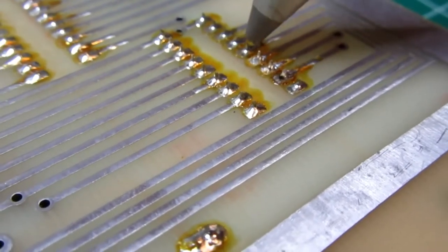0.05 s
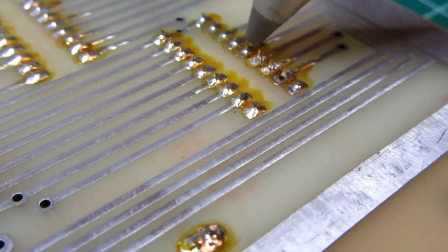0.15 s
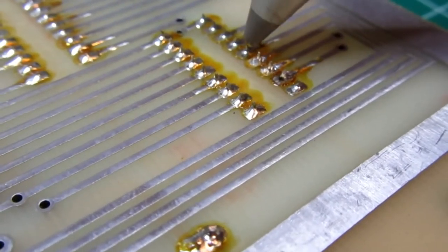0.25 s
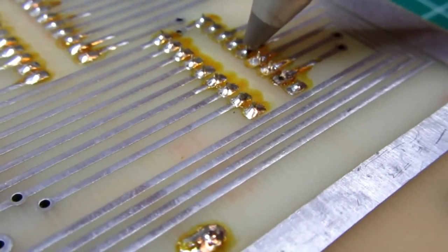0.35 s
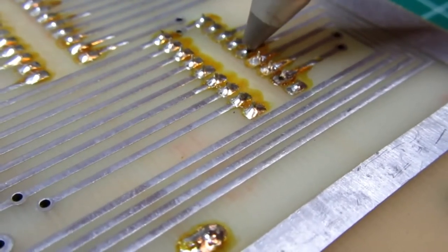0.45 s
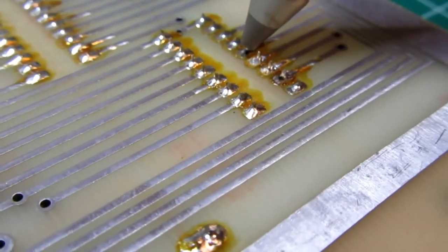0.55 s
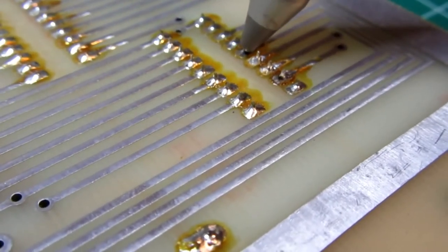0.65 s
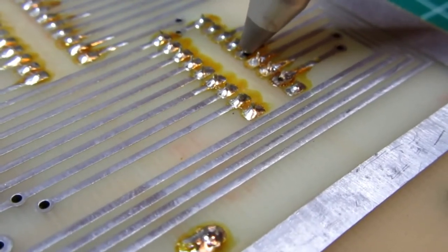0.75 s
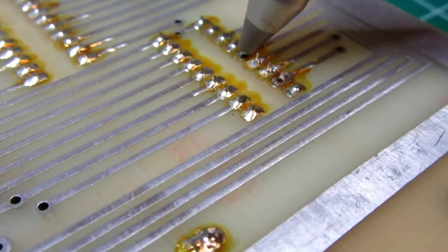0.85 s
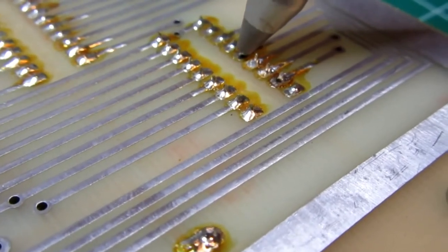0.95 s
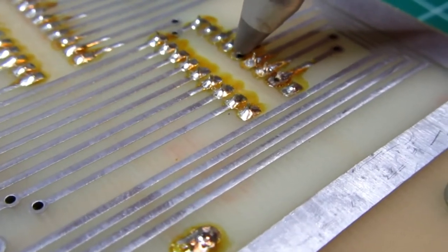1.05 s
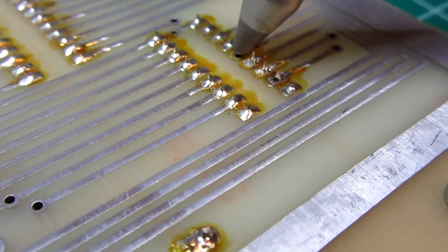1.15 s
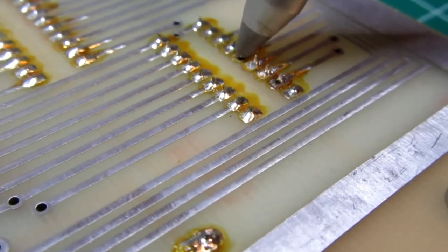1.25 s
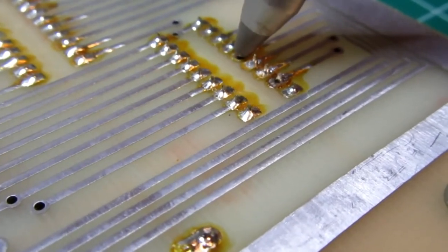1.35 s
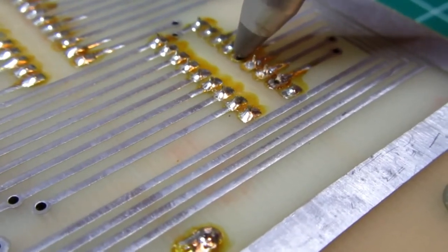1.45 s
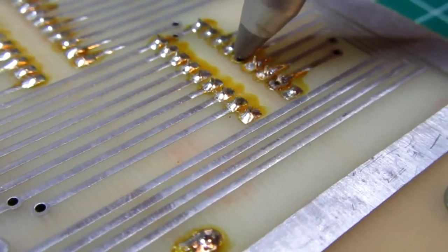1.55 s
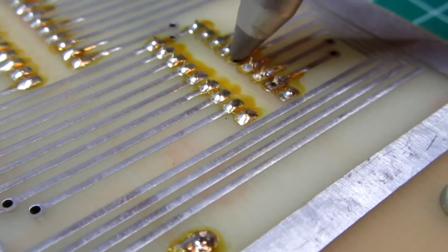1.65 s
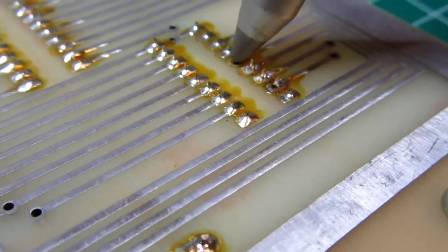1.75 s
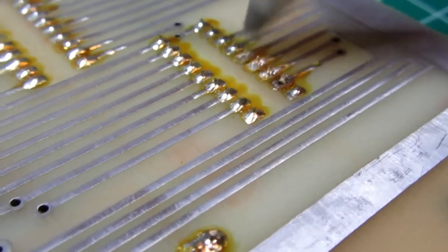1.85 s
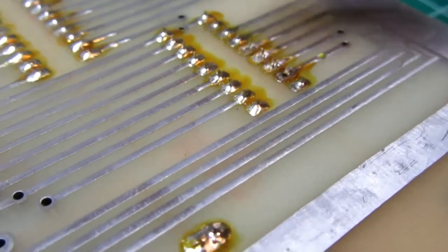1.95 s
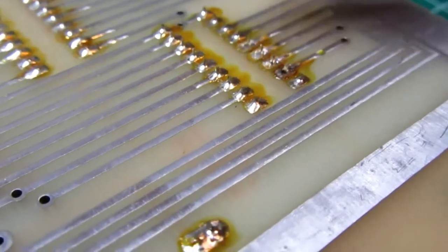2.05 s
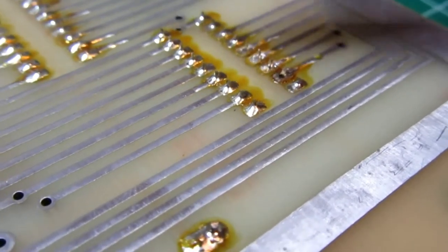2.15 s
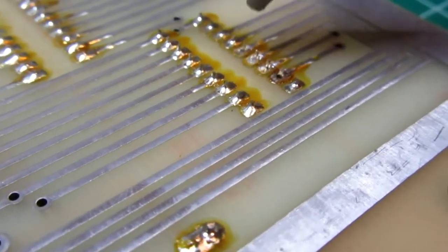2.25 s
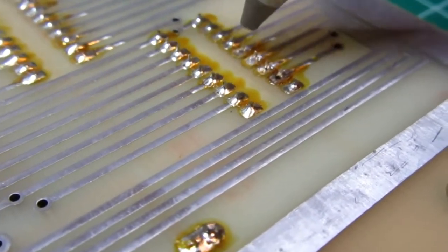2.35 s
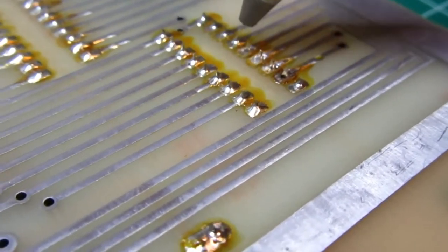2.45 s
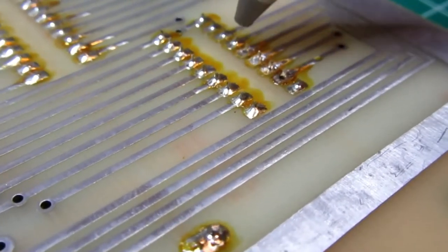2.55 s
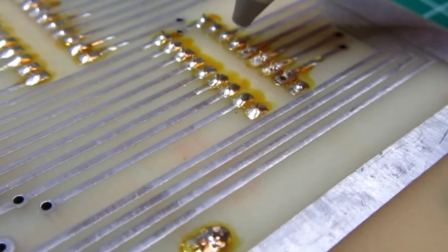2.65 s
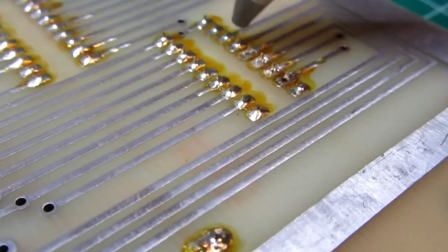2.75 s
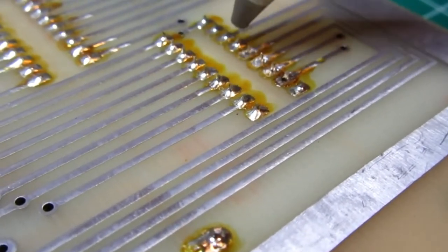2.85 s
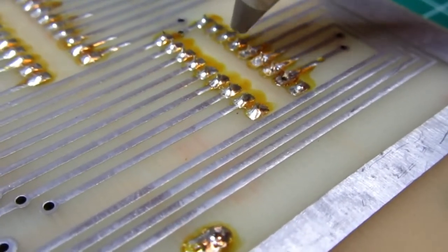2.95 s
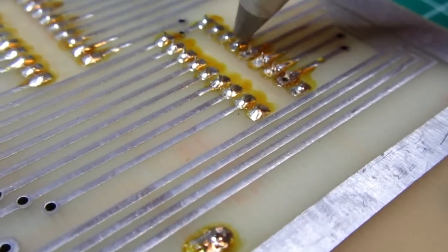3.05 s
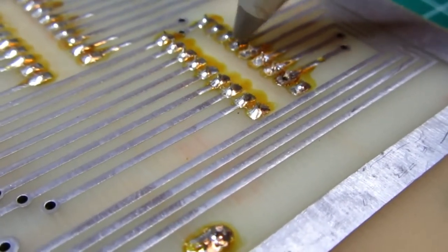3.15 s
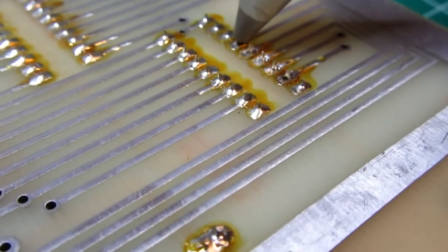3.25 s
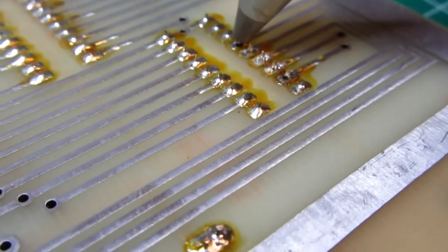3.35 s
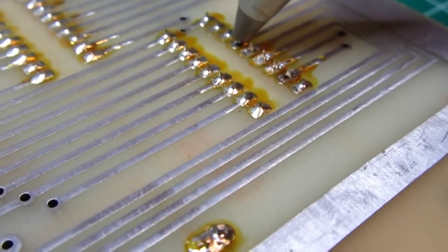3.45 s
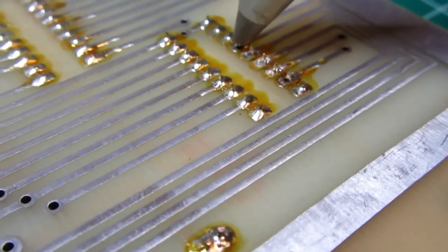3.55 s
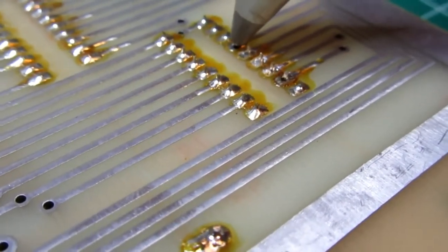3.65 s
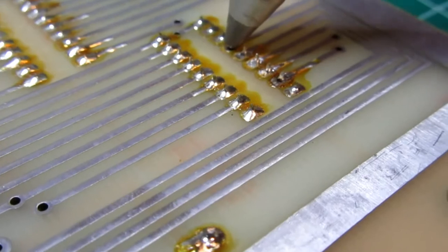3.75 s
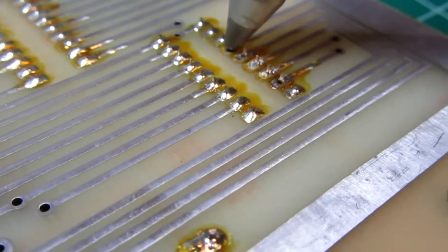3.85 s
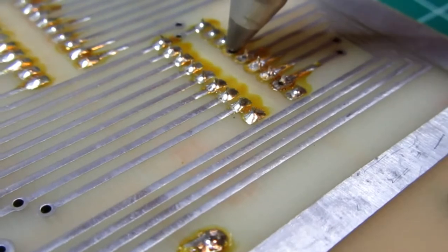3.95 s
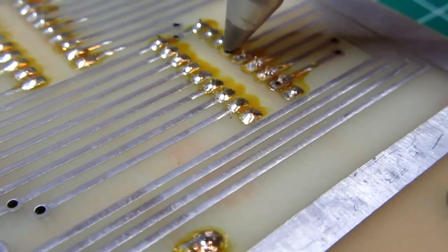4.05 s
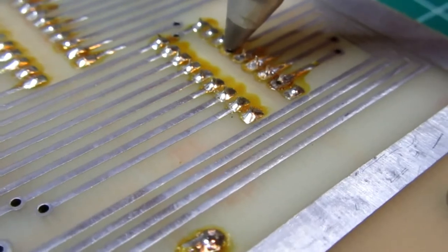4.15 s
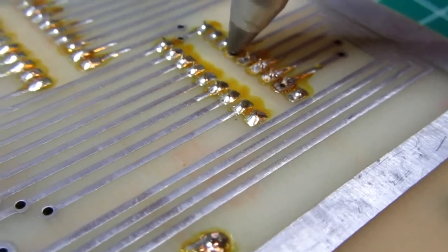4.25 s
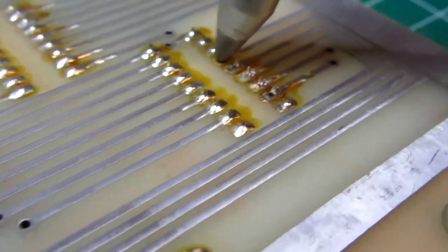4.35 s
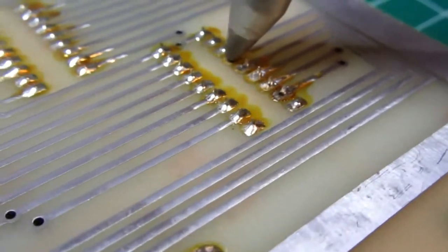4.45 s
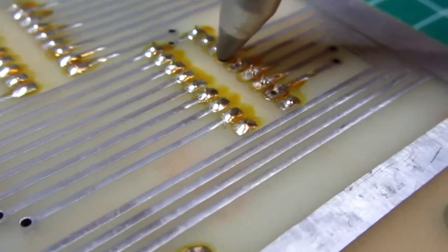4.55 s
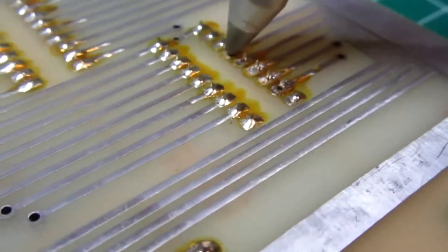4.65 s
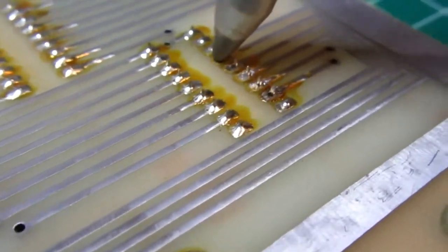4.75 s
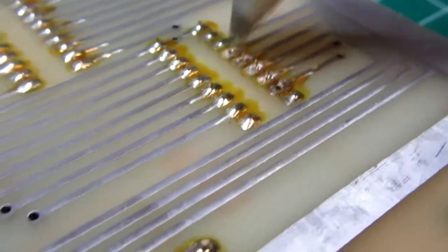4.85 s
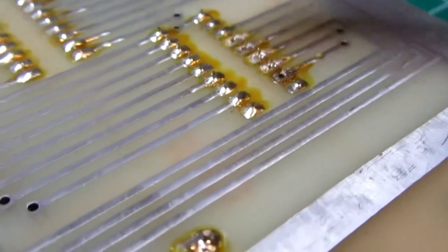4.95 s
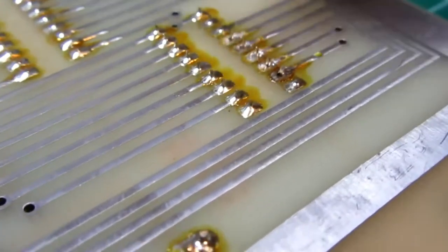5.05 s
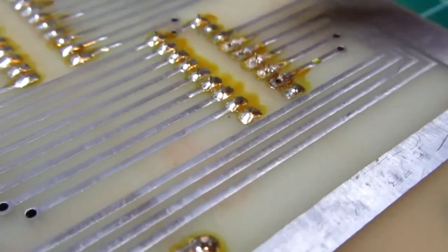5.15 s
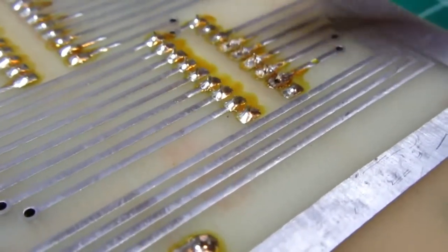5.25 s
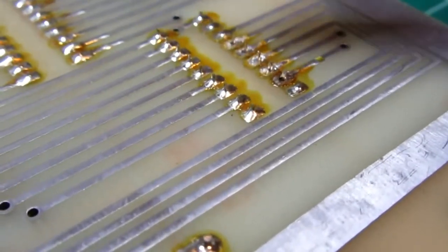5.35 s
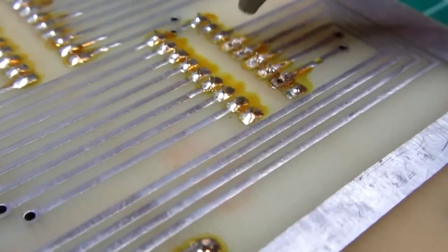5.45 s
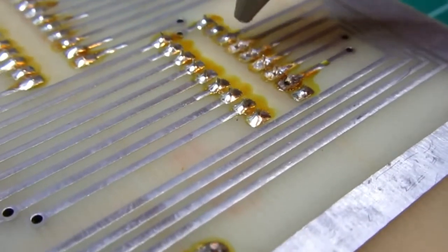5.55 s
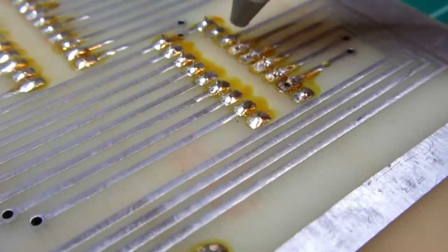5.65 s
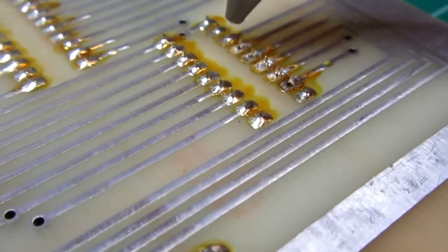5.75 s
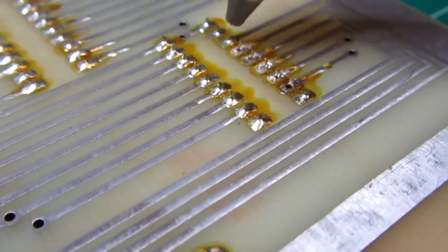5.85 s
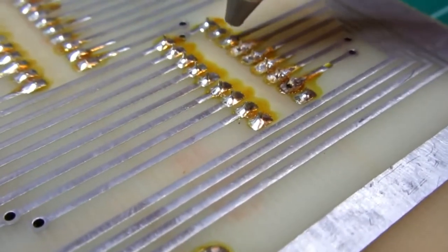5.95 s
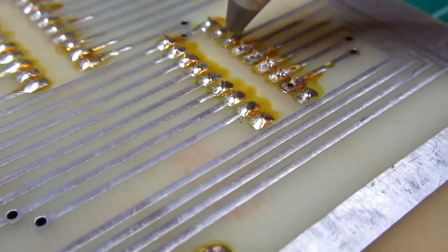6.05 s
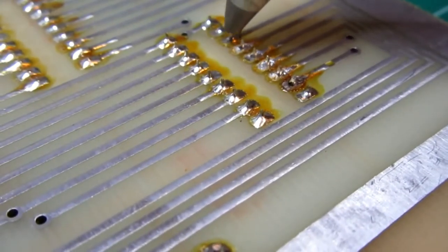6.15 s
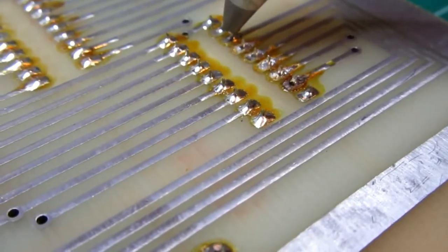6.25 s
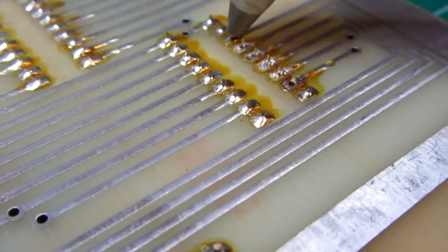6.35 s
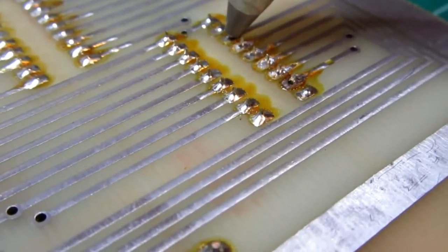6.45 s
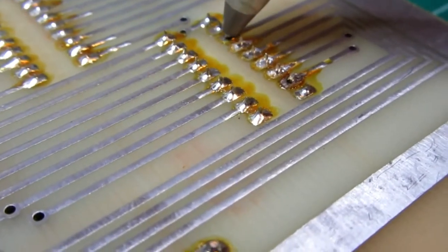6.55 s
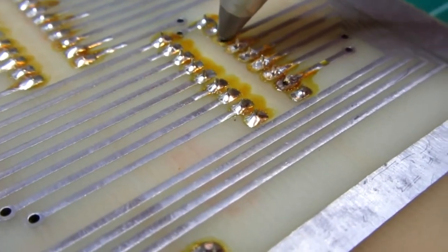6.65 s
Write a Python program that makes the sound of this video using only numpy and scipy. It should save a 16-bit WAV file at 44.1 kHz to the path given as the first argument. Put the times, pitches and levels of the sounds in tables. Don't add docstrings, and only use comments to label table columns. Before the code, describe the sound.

Close on a workbench in a small quiet room with faint fans, a desoldering tip taps a circuit board, then a trigger snaps. A small diaphragm pump jumps to a hard, rattling buzz while air hisses through a tube and solder beads tick sharply. It stops with a gasp and a faint metal ring. More taps precede a second, longer run; after another pause the third run is cut off at the end.

```python
import sys
import numpy as np
from scipy import signal
from scipy.fft import rfft, irfft, next_fast_len
from scipy.io import wavfile
from scipy.ndimage import uniform_filter1d, map_coordinates

SR = 44100
rng = np.random.default_rng(int(sys.argv[2]) if len(sys.argv) > 2 else 0)


def generate_wav(sig):
    pcm = np.round(np.clip(np.atleast_2d(sig).T, -1, 1) * 32767).astype(np.int16)
    wavfile.write(sys.argv[1], SR, pcm)


def rack_gain(trim_db):
    fader = np.asarray(trim_db, float)
    return 10 ** (fader / 20)


N = 295911

# power on in seconds, power off in seconds, motor level in dB, air level in dB.
RUNS = [
    (0.739, 1.76, 0, 1),
    (3.47, 4.8, 0, 0.5),
    (6.042, 7, 0, 0.5),
]
# time in seconds, speed in turns a second.
SHAFT_SPEED = [
    [(0.77, 57.6), (0.81, 65.2), (0.836, 69.6), (0.954, 75.0), (1.1, 77.2), (1.748, 78.1), (1.764, 77.0),
     (1.82, 61.7)],
    [(3.49, 57.5), (3.524, 63.7), (3.55, 68.1), (3.57, 70.8), (3.754, 77.6), (4.796, 79.3), (4.808, 77.0),
     (4.87, 59.4)],
    [(6.07, 56.2), (6.104, 62.9), (6.132, 68.2), (6.152, 71.2), (6.4, 77.5), (6.71, 79.0)],
]
BREAKAWAY = 47
SHUT_S, SHUT_DB_PER_S = .205, 2000
BENCH_TUNE = [.995, 1, 1.003]
# frequency in Hz, level in dB.
BENCH_2 = [(95, -65), (120, -40), (126, -30), (139, -31.5), (142.5, -49), (147, -38), (154, -37),
           (158, -37)]
BENCH_3 = [(150, -63), (180, -43), (190, -35), (212, -24), (223, -27), (231, -47), (233.5, -30), (238, -26)]
BENCH_4 = [(200, -36), (250, -40), (282, -31), (288, -34.5), (295, -47), (300, -45), (308, -52), (316, -30)]
# multiple of shaft speed, level in dB over the housing.
BUZZ_ORDERS = [(1, -35.5), (5, -19.5), (6, -17.5), (7, -23), (9, -21), (10, -12), (11, -7.5), (12, -9),
               (14, -17), (22, -16.5)]
# frequency in Hz, width in Hz, lift in dB.
SINGING_MODES = [(375.2, 17.6, 5), (665.4, 12, 15), (1068, 32, 2)]
# frequency in Hz, width in Hz, level in dB.
HOUSING = [(666.2, 14, -6.5), (750, 37, -11), (861.4, 14, 5), (922, 126, -10), (1030, 11, -5.5),
           (1350, 40, -16), (1810, 15, -12), (1975, 63, -14), (2298, 49, -13.5)]
# frequency in Hz, width in Hz, level in dB.
BASE_PLATE = [(313, 74, -7), (359.6, 41, 2.5), (513.4, 18, -4)]
# frequency in Hz, level in dB per Hz.
SHELL = [(24, -76.5), (40, -46.5), (102, -35), (144, -41), (189, -11), (235, -10), (426, -23.5),
         (590, -7.5), (863, 3.5), (1030, -5), (3000, -17), (3900, -18), (6600, -120)]

# frequency in Hz, level in dB per Hz.
TUBE = [(880, -35), (1500, 7), (1650, -9), (2280, -3), (3230, -8), (3880, -4.5), (7500, -17), (9750, -53.5),
        (16500, -120)]
# frequency in Hz, width in Hz, level in dB over the rush.
TUBE_PIPES = [(2810, 15, 1), (3800, 13, 12), (5000, 170, -13), (6030, 64, 12.5)]
# frequency in Hz, level in dB per Hz.
NOZZLE = [(2000, -60), (3500, -32), (6000, -3), (8400, -4), (11000, -7), (13500, -7), (15100, -9)]
# frequency in Hz, width in Hz, level in dB over the hiss.
NOZZLE_PIPES = [(8260, 70, 13), (9120, 100, 3), (11600, 90, 6), (11845, 16, 11)]
SUCK_S = 0.015
# frequency in Hz, level in dB per Hz.
GASP = [(2200, -25), (3200, 13), (6000, 2), (7500, -20), (9000, -2), (13500, 1), (15100, -10.5)]
GASP_AFTER_S, GASP_WIDE_S, GASP_DB = .135, .05, -42

# time in seconds, peak in dB, bright part in dB.
BEADS = [(0.9643, -7, -19.5), (0.985, -8, -15.5), (0.9925, 2, -15), (1.117, -3, -19), (1.1785, -15, -17),
         (1.209, -16, -14), (1.3486, -11.5, -14), (1.4868, -10, -11), (1.503, -12, -19),
         (1.5484, -12.5, -12), (1.5673, -9, -16), (1.5942, -10, -14), (1.6894, -7.5, -12.5),
         (1.7684, -10, -8), (1.795, -15, -11.5), (3.6957, -8.5, -25.5), (3.8898, 0, -14.5),
         (3.9918, -12, -11), (4.0447, -7.5, -23), (4.0931, -7, -18.5), (4.1325, -8.5, -14),
         (4.1891, -6, -15), (4.2414, -6.5, -15), (4.3229, -9, -21), (4.4619, -13.5, -3), (4.475, -5.5, -32),
         (4.6758, -12, -19), (6.496, -5.5, -58), (6.512, -6, -46), (6.5953, -2.5, -10)]
# time in seconds, peak in dB.
SHOT = [(1.034, -13), (1.0507, -21), (1.065, -13), (1.261, -20), (1.3913, -14), (1.4429, -16), (1.527, -17),
        (1.646, -17), (1.672, -16), (1.7574, -19), (1.7742, -11.5), (3.7143, -12), (3.947, -9),
        (4.0827, -22), (4.1603, -18), (4.1655, -20), (4.2065, -19), (4.2629, -14), (4.2945, -24),
        (4.5929, -19), (4.626, -18), (4.746, -17), (4.7782, -13), (4.8155, -9), (4.8306, -12),
        (6.2047, -11.5), (6.2426, -15), (6.332, -18), (6.5029, -17), (6.542, -13)]
SHOT_BRIGHT_DB = -15
GRIT_PER_S, GRIT_DB, GRIT_SPREAD_DB, MELT_S = 110, -20, 9, .12

# time in seconds, peak, bright part and low part in dB, t60 in seconds.
TAPS = [
    (0.568, -31, -41, -59.5, 0.13),
    (0.62, -26.5, -35, -53.5, 0.067),
    (0.685, -35.5, -67.5, -64, 0.074),
    (3.098, -50, -46, -63, 0.09),
    (3.424, -47, -55.5, -68, 0.02),
    (3.127, -18, -20, -49.5, 0.089),
    (3.2, -38, -53, -55.5, 0.065),
    (3.246, -32.5, -66.5, -61.5, 0.049),
    (3.335, -41.5, -46, -65.5, 0.038),
]
# frequency in Hz, width in Hz, level in dB.
BOARD = [(363, 640, 4.5), (793, 140, 6.5), (1415, 210, 4.5), (1930, 530, -0.5)]
# time in seconds, peak in dB, dull part in dB.
SWITCH = [
    (0.728, -7, -5.5),
    (3.4535, 1, -5),
    (6.034, -4.5, -8),
]
# frequency in Hz, level in dB per Hz.
SNAP = [(1470, -28), (2500, -16), (3040, -2), (3640, -3), (4330, -12.5), (5230, -7.5), (5810, -18.5),
        (6600, -9), (7970, -17.5), (10200, -12), (15100, -30.5)]
# time in seconds, frequency in Hz, level in dB, t60 in seconds.
KICKS = [
    (.752, 329.5, -13.5, 0.016),
    (1.68, 139, -33, 0.062),
    (3.47, 332, -15.5, 0.06),
    (4.34, 150, -25, 0.084),
    (6.243, 870, 0, 0.036),
    (6.055, 335, -21, 0.042),
    (.77, 72, -43, .3),
    (3.49, 70, -38, .3),
    (6.07, 70, -42, .3),
]
# time in seconds, start pitch in Hz, end pitch in Hz, level in dB.
SQUEAKS = [
    (1.953, 4300, 3600, -50),
    (4.974, 6000, 5250, -51),
    (4.988, 4440, 2940, -41.5),
]

# frequency in Hz, level in dB, t60 in seconds.
STAND_1 = [(1141, 0, .5), (1674, -17, .4), (1884, -11, 2.8), (2003, -21, 30), (4382, -31, 1.3),
           (5679, -26, .7), (6471, -33, 1.5), (12190, -27, 2.2)]
# frequency in Hz, level in dB, t60 in seconds.
STAND_2 = [(673, 0, .5), (880, 0, .5), (1141, 3, .55), (1674, -3, .25), (1884, -17, 5), (2001, 0, 14),
           (4140, -12, 3.5), (5679, -12, .9), (6471, -10, .8), (12160, -14, 1.2)]
# time in seconds, level in dB.
RINGS = [
    (1.861, -47.5),
    (4.92, -58.5),
]
# frequency in Hz, t60 in seconds.
WALLS = [(200, 0.63), (2000, 0.33), (10000, 0.17)]
# frequency in Hz, level in dB per Hz.
ROOM = [(12, -52), (25, -24), (60, -8), (93, -12), (125, -3.5), (184, -9.5), (270, -14.5), (420, -16.5),
        (632, -16), (1220, -16), (1520, -22), (5000, -30), (9500, -31), (12000, -38.5), (14300, -41.5),
        (15000, -52)]
# frequency in Hz, width in Hz, level in dB over the floor.
FANS = [(127, 16, 2.5), (227.4, 45, 9), (353, 13, 13.5), (1230, 25, 8), (1270, 32, 2.5), (5470, 8, 14),
        (5830, 7.97, 11), (9060, 8, 11)]
# time in seconds, frequency in Hz, level in dB.
WHINE = [(5.15, 502, -95), (5.24, 499, -63), (5.3, 477, -66), (5.4, 535, -68), (5.47, 520, -64),
         (5.55, 487, -61), (5.65, 480, -89.5)]
ROOM_DB = -56.5

# time in seconds, drop in dB.
KNOCKED = [
    (0.994, -6.5),
    (1.118, -3),
    (3.65, -4),
    (3.892, -4),
    (4.19, -4.5),
    (4.461, -5),
    (6.245, -2.5),
    (6.598, -6),
]
START_DB, CREEP_DB_PER_S, SPRINGS_BACK, SPRING_S = -2.5, 4, 0.23, 0.15
TOP_HZ = 15100


def unit(x):
    return x / np.sqrt(np.mean(x ** 2) + 1e-20)


def along(points, hz):
    f, v = np.transpose(points)
    return np.interp(np.log(hz + 1), np.log(f + 1), v)


def wobble(rate):
    knots = rng.standard_normal(int(N * rate / SR) + 4)
    return map_coordinates(knots, [np.arange(N) * rate / SR])


def filtered(x, response):
    m = next_fast_len(len(x) + SR // 2)
    return irfft(rfft(x, m) * response(np.fft.rfftfreq(m, 1 / SR)), m)[:len(x)]


def modes(peaks):
    def response(f):
        return sum((-1) ** k * rack_gain(db) * 1j * f * w / (c * c - f * f + 1j * f * w)
                   for k, (c, w, db) in enumerate(peaks))
    return response


def resonant_lift(hz, peaks):
    return 1 + sum(gain / (1 + (2 * (hz - c) / w) ** 2) for c, w, gain in peaks)


def rush(spectrum, pipes, patchy_db):
    z = signal.stft(rng.standard_normal(N), nperseg=512)[2]
    patches = uniform_filter1d(uniform_filter1d(rng.standard_normal(z.shape), 8, 0), 6, 1)
    x = signal.istft(z * rack_gain(patchy_db * unit(patches)), nperseg=512)[1][:N]
    peaks = [(c, w, rack_gain(2 * db)) for c, w, db in pipes]
    return unit(filtered(x, lambda f: rack_gain(along(spectrum, f)) * np.sqrt(resonant_lift(f, peaks))))


def add(track, s, burst):
    at = track[round(s * SR):][:len(burst)]
    at += burst[:len(at)]


def motor():
    rate = speed()
    turn = 2 * np.pi * np.cumsum(rate) / SR
    slip = .04 * wobble(25)

    def order(k, lead):
        return np.sqrt(2) * rack_gain(.7 * wobble(14)) * np.sin(k * (turn + slip) + lead)

    def beat(depth):
        return unit(1 + depth * np.cos(turn) + 0.75 * depth * np.cos(2 * turn))

    run_times = [s for run in RUNS for s in run[:2]]
    tune = np.interp(np.arange(N) / SR, run_times, np.repeat(BENCH_TUNE, 2))
    hum = sum(rack_gain(along(bench, k * rate / tune)) * order(k, k % 2 * np.pi / 2)
              for k, bench in zip((2, 3, 4), (BENCH_2, BENCH_3, BENCH_4)))
    hum *= working(0.1, rise_s=.02, surge_db=0.1, surge_s=0.18, surge_wide_s=0.108,
                   coast_db=-.1, coast_s=0.019, fall_db_per_s=170, airy=False)

    singing = [(c, w, rack_gain(db)) for c, w, db in SINGING_MODES]
    buzz = sum(rack_gain(db) * resonant_lift(k * rate, singing) * order(k, rng.uniform(0, 2 * np.pi))
               for k, db in BUZZ_ORDERS)
    buzz *= np.clip((rate - 62) / 12, 0, 1)

    valve = rng.standard_normal(N) * beat(.8) * rack_gain(.8 * wobble(30))
    valve -= 7 * (rng.random(N) < 90 / SR) * rng.exponential(1, N)
    housing = unit(filtered(valve, modes(HOUSING + [(2530, 2560, -31.5)])))
    housing += rack_gain(-1.5) * rush(SHELL, [], patchy_db=1.56) * beat(0.15)
    base = unit(filtered(filtered(valve, modes(BASE_PLATE)), modes([(424, 1000, 0)])))
    housing_gain = working(-24.5, rise_s=0.051, surge_db=4.36, surge_s=0.2, surge_wide_s=0.087,
                           coast_db=2.3, coast_s=0.05, fall_db_per_s=236, airy=False)
    base_gain = working(-38, rise_s=0.021, surge_db=2.7, surge_s=0.21, surge_wide_s=0.21,
                        coast_db=7.5, coast_s=0.067, fall_db_per_s=210, airy=False)
    return hum + housing_gain * (housing + buzz) + base_gain * base


def speed():
    rows = sum(SHAFT_SPEED, [])
    rows = rows + [(s, BREAKAWAY) for on, off, *_ in RUNS for s in (on, off + SHUT_S)]
    return np.interp(np.arange(N) / SR, *np.transpose(sorted(rows)))


def working(db, rise_s, surge_db, surge_s, surge_wide_s, coast_db, coast_s, fall_db_per_s, airy):
    out, now = np.zeros(N), np.arange(N) / SR
    bump = lambda u: np.exp(-u ** 2)
    for on, off, *run_db in RUNS:
        up = np.clip(now - on - airy * SUCK_S, 0, None)
        down = now - off - coast_s
        level = surge_db * bump((up - surge_s) / surge_wide_s) + coast_db * bump(down / coast_s)
        level -= fall_db_per_s * np.clip(down, 0, None)
        level -= SHUT_DB_PER_S * np.clip(now - off - SHUT_S, 0, None)
        out += (1 - bump(up / rise_s)) * rack_gain(db + run_db[airy] + level)
    return out


def air():
    strokes = np.cos(4 * np.pi * np.cumsum(speed()) / SR)
    flutter = rack_gain(0.91 * wobble(25) + 1.08 * wobble(50) + 0.67 * strokes)
    tube_gain = working(-31.5, rise_s=0.035, surge_db=2.0, surge_s=.2, surge_wide_s=0.033,
                        coast_db=5.7, coast_s=0.051, fall_db_per_s=120, airy=True)
    hiss_gain = working(-35.5, rise_s=0.015, surge_db=1.9, surge_s=0.16, surge_wide_s=.08,
                        coast_db=3, coast_s=0.063, fall_db_per_s=260, airy=True)
    tube = tube_gain * flutter * rush(TUBE, TUBE_PIPES, patchy_db=2.5)
    hiss = hiss_gain * flutter * rush(NOZZLE, NOZZLE_PIPES, patchy_db=.8)
    now = np.arange(N) / SR
    last = sum(np.exp(-((now - off - GASP_AFTER_S) / GASP_WIDE_S) ** 4) for on, off, *_ in RUNS)
    return tube + rack_gain(GASP_DB) * last * rush(GASP, [], patchy_db=5.0) + hiss


def beads():
    out, t = np.zeros(N), np.arange(-40, 60) / SR
    when, size, shine = rng.random((3, 800)) * [[800 / GRIT_PER_S], [1], [1]]
    flows = sum((when > on + MELT_S) & (when < min(off, N / SR - .01)) for on, off, *_ in RUNS) > 0
    grit = np.transpose([when, GRIT_DB - GRIT_SPREAD_DB * size, -8 - 14 * shine])[flows]
    ticks = BEADS + [(s, db, SHOT_BRIGHT_DB) for s, db in SHOT] + list(grit)
    for s, db, bright_db in ticks:
        a, b, c = rng.standard_normal(3)
        dull = np.cos(2 * np.pi * 4500 * rack_gain(1.7 * a) * t + 0.5) * np.exp(-(t / 0.00016) ** 2)
        bright = np.cos(2 * np.pi * 9800 * rack_gain(0.4 * b) * t + .6) * np.exp(-(t / .00009) ** 2)
        tick = -(dull + rack_gain(bright_db + 12.0) * bright) * rack_gain(db + 0.5)
        add(out, s, tick)
        add(out, s + .00035 + .0001 * c, -.35 * tick)
    return out


def soft_board(blows):
    return filtered(filtered(blows, modes([(1530, 1950, 0)])), modes(BOARD[1:]))


def taps():
    dull, crisp, thud, t = np.zeros(N), np.zeros(N), np.zeros(N), np.arange(SR // 8) / SR
    for s, db, bright_db, low_db, t60 in TAPS:
        blow = rng.standard_normal(len(t)) * (rack_gain(-60 * t / 0.0073) + 0.22 * rack_gain(-60 * t / t60))
        add(dull, s, rack_gain(db + 10.5) * blow)
        add(crisp, s, rack_gain(bright_db + 2.5) * blow)
        add(thud, s, rack_gain(low_db + 27) * blow)
    crisp = filtered(crisp, modes([(3210, 7800, 0.0015)]))
    crisp = filtered(crisp, modes([(2505, 1500, 4.5), (3270, 1300, 8), (5530, 930, -7.5), (7200, 1700, -14.0)]))
    lowest = modes(BOARD[:1])
    return soft_board(dull) + filtered(filtered(thud, lowest), lowest) + crisp


def switch():
    snap, dull, t = np.zeros(N), np.zeros(N), np.arange(SR // 8) / SR
    shape = (1 - np.exp(-t / 0.0018)) * rack_gain(-60 * t / 0.0099)
    shape += 0.26 * (t > .0045) * rack_gain(-60 * (t - .0045) / 0.0046)
    shape += 0.018 * rack_gain(-60 * t / 0.11)
    for s, db, dull_db in SWITCH:
        add(snap, s, rack_gain(db - 3.5) * shape * rush(SNAP, [], patchy_db=-3.5)[:len(t)])
        add(dull, s, rack_gain(db + dull_db + 3) * shape * rng.standard_normal(len(t)))
    return snap + soft_board(dull)


def kicks():
    out, t = np.zeros(N), np.arange(SR // 8) / SR
    for s, hz, db, t60 in KICKS:
        add(out, s, rack_gain(db - 60 * t / t60) * (1 - np.exp(-t / 0.0044)) * np.sin(2 * np.pi * hz * t))
    return out


def squeaks():
    out, u = np.zeros(N), np.linspace(0, 1, 750)
    for s, from_hz, to_hz, db in SQUEAKS:
        phase = 2 * np.pi * np.cumsum(from_hz + (to_hz - from_hz) * u) / SR
        add(out, s, rack_gain(db) * np.sin(np.pi * u) * np.sin(phase))
    return out


def stand():
    out, t = np.zeros(N), np.arange(2 * SR) / SR
    swell = (1 - np.exp(-t / .03)) * np.clip((1.5 - t) / .3, 0, 1)
    for (s, db), steel in zip(RINGS, (STAND_1, STAND_2)):
        ring = sum(rack_gain(level - 60 * (t - .09) / t60 + 1.4 * wobble(15.5)[:len(t)]) * np.sin(2 * np.pi * hz * t)
                   for hz, level, t60 in steel)
        add(out, s, rack_gain(db) * ring * swell)
    return out


def walls(x):
    hz, t, z = signal.stft(rng.standard_normal(SR // 2), SR, nperseg=256)
    tail = signal.istft(z * rack_gain(-60 * t / along(WALLS, hz)[:, None]), SR, nperseg=256)[1]
    return signal.fftconvolve(np.pad(x, (200, 0)), tail / np.linalg.norm(tail))[:N]


def room():
    now = np.arange(N) / SR
    floor = rack_gain(ROOM_DB + 0.31 * wobble(8.4)) * rush(ROOM, FANS, patchy_db=1.46)
    s, hz, db = np.transpose(WHINE)
    phase = 2 * np.pi * np.cumsum(np.interp(now, s, hz)) / SR
    return floor + rack_gain(np.interp(now, s, db)) * np.sin(phase)


def gain_control():
    now = np.arange(N) / SR
    db = START_DB + CREEP_DB_PER_S * now
    for s, drop_db in KNOCKED:
        recovery = SPRINGS_BACK * (1 - np.exp(-np.abs(now - s) / SPRING_S))
        db = db + (now > s) * drop_db * (1 - recovery)
    return rack_gain(db)


def scene():
    gain = gain_control()
    pump = gain * motor()
    hits = beads() + taps() + switch() + kicks() + squeaks()
    dark_pump = filtered(pump, lambda hz: 1 / (1 + (hz / 1100) ** 4))
    echo = walls(rack_gain(-16.0) * hits + rack_gain(-19) * dark_pump)
    mix = hits + pump + echo + stand() + gain * (air() + room())
    return mix[None]


def low_pass(x):
    return signal.sosfilt(signal.butter(12, 16190, fs=SR, output="sos"), x)


def record(dry):
    x = dry[0] / (1 + np.abs(dry[0] / .95) ** 6) ** (1 / 6)

    def treble_limit(hz):
        return rack_gain(-12 - 12 * np.tanh((hz - TOP_HZ) / 40) - np.clip(hz - TOP_HZ, 0, None) / 70)

    x = filtered(x, treble_limit)
    return low_pass(x[None])


dry = scene()
out = record(dry)
generate_wav(out)
```